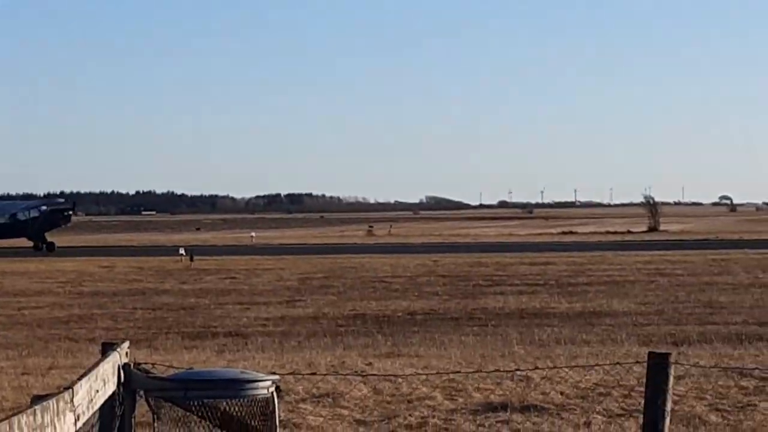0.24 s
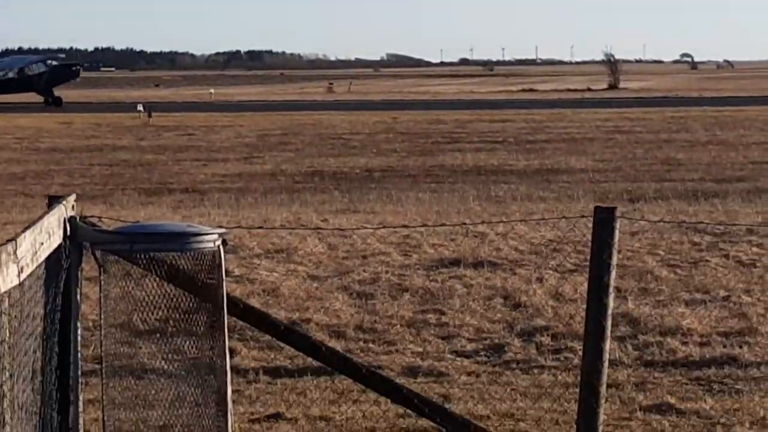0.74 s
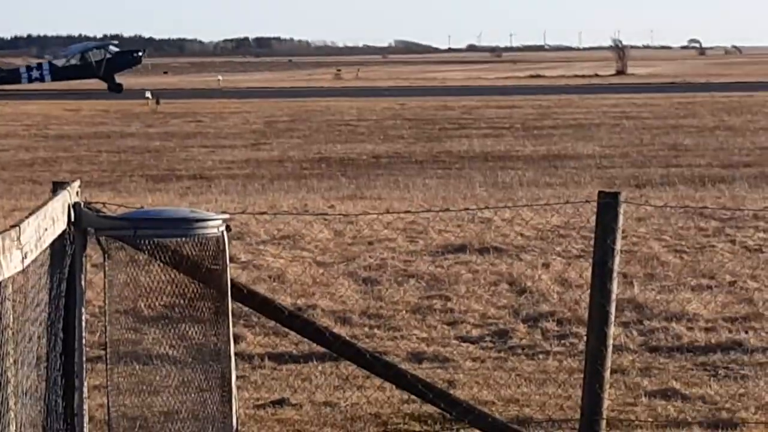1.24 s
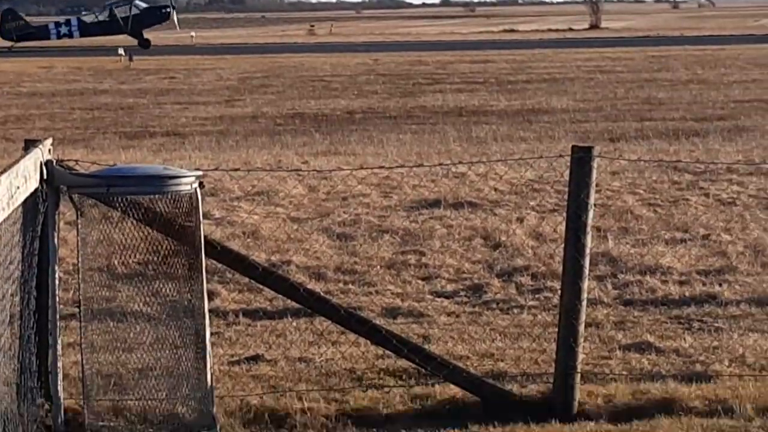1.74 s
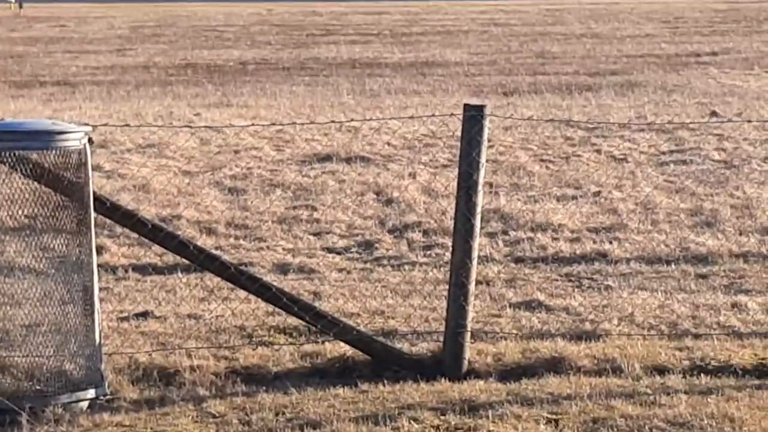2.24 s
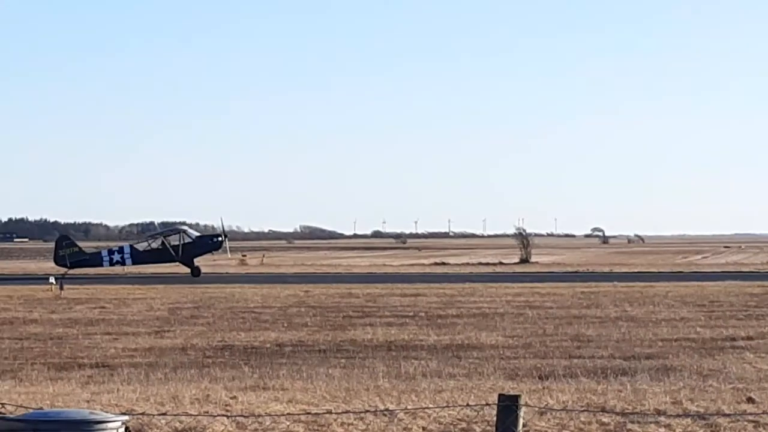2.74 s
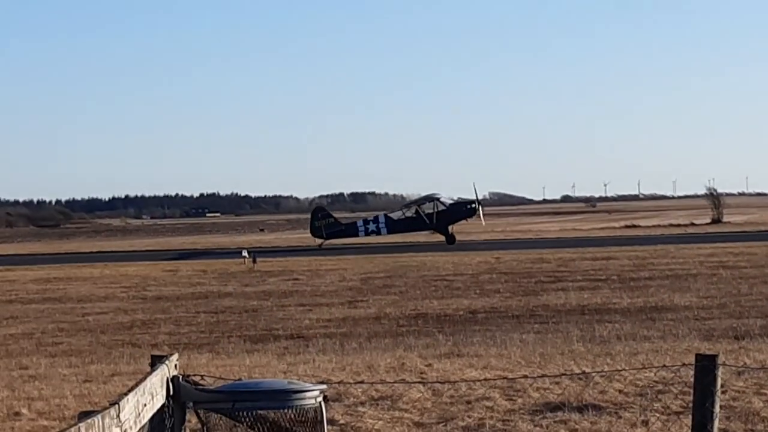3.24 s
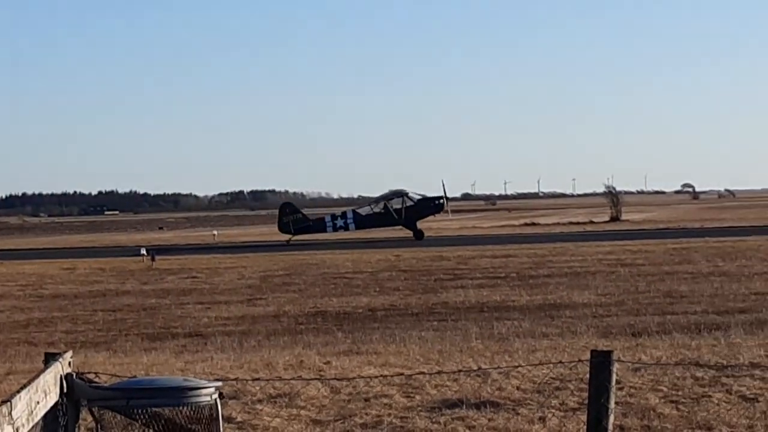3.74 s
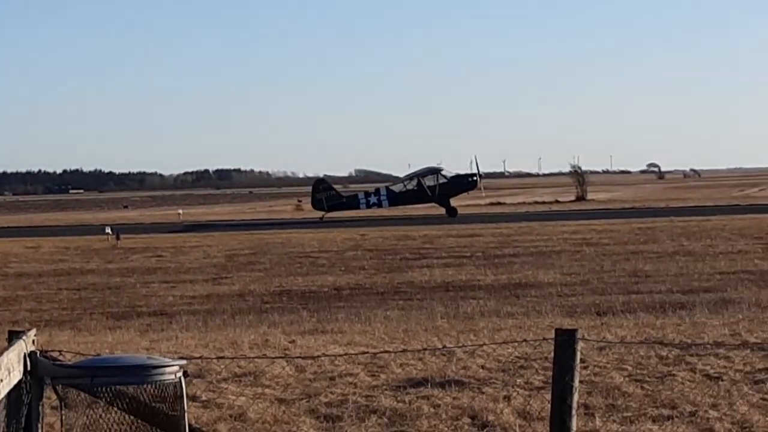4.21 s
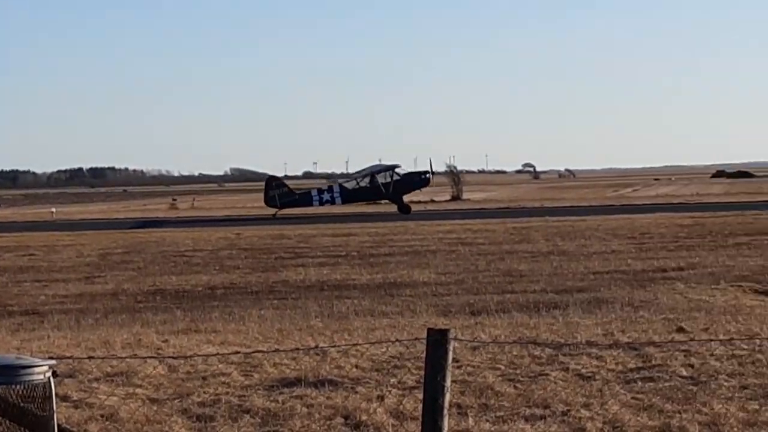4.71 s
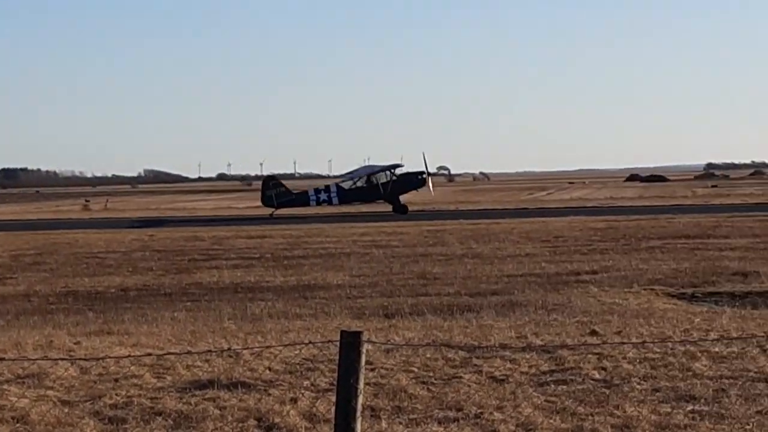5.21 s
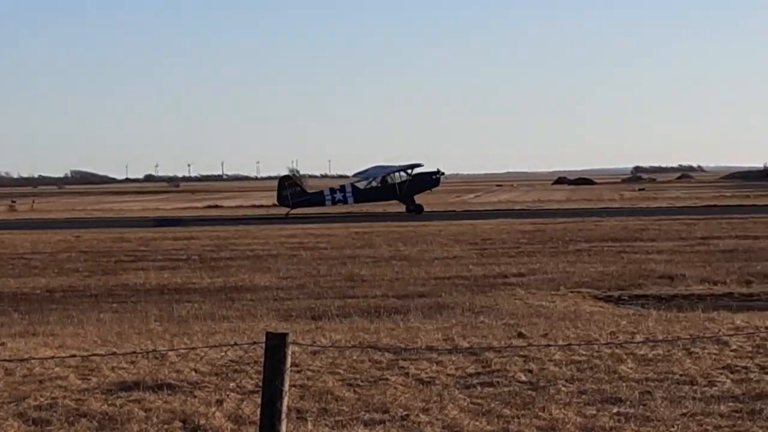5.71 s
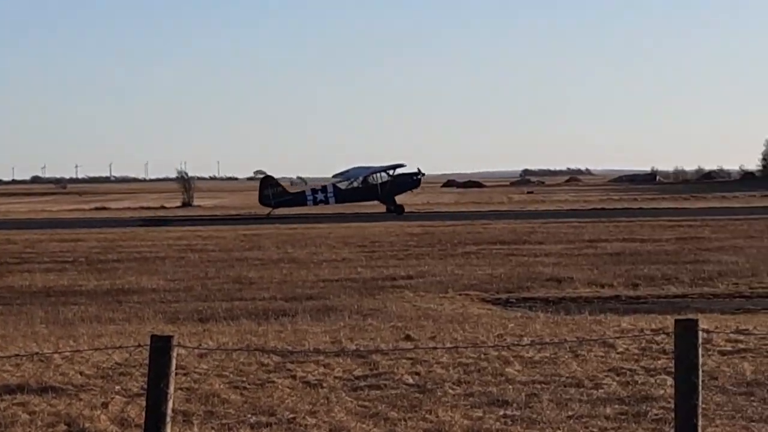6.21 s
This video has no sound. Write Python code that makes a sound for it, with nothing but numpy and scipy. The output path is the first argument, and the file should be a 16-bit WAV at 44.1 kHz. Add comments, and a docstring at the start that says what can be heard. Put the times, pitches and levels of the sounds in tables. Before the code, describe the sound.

A single-engine propeller plane accelerates along a runway, heard from a fence across open grass. Its low fluttering drone climbs in pitch, with rapid exhaust bark and pulsing hiss that brighten and strengthen toward the end. Wind thumps the handheld stereo microphone early and late, crackling more on the right, with a quieter stretch between. Faint handling rustles, a short scuff and tiny clicks sit very close.

```python
"""Light aircraft rolling past

A single-engine aircraft opens its throttle and rolls past on a runway, heard from the airfield fence.
Four cylinders and a two-blade propeller give a drone of sine partials, and gated noise makes the
rattling bark and pulsing hiss. Bundles of filtered noise buffet the two microphone ports, with rustles,
a scrape and clicks close by over a grassy rumble. A wind filter ducks the bass of the right port.
"""
import sys
import numpy as np
from scipy import signal
from scipy.fft import rfft, irfft
from scipy.io import wavfile
from scipy.ndimage import uniform_filter1d, map_coordinates

SR = 44100
rng = np.random.default_rng(int(sys.argv[2]) if len(sys.argv) > 2 else 0)


def dump(signal):
    """Clip the signal to [-1, 1] and save it as 16-bit WAV at the path in sys.argv[1]."""
    limited = np.clip(np.atleast_2d(signal).T, -1, 1)
    pcm = np.round(limited * 32767).astype(np.int16)
    wavfile.write(sys.argv[1], SR, pcm)


N = 284753
TIME = np.arange(N) / SR  # seconds
FREQ = np.maximum(np.arange(N // 2 + 1) * SR / N, 1)  # Hz, kept off zero for the logarithms

# engine speed as heard, in firings and blade passes a second: time_s, firing_rate_hz
ENGINE_SPEED = [(0.1, 38.9), (0.5, 39.9), (1, 43.15), (1.4, 46.95), (1.8, 48.15), (2.2, 49.55), (2.6, 49.8),
                (3, 50.05), (3.4, 50.3), (3.8, 50.35), (4.2, 50.95), (4.6, 51.9), (5, 52.17), (5.4, 53.82),
                (5.8, 54.56), (6.1, 56.54), (6.4, 57.79)]
# propeller drone before the balance of its partials: time_s, level_db
DRONE_LEVEL = [(0, -40), (1, -49), (2.3, -46), (3, -44), (4, -41.5), (5, -41), (5.8, -41), (6.4, -35)]
# drone partials: multiple_of_firing_rate, early_level_db, late_level_db
DRONE_PARTIALS = [(1, -7.5, -2.5), (2, 1, -1.5), (3, -17.5, -12.5), (4, -34.5, -14), (5, -30, -29),
                  (6, -19.5, -16)]
# exhaust bark as it carries across the field, before the mix trims: time_s, level_db
BARK_CURVE = [(0, -55), (0.3, -51.5), (0.85, -45), (1.35, -49.5), (1.9, -42.5), (2.2, -48.5), (3.35, -48),
              (3.6, -43), (4.65, -38), (4.85, -42.5), (5.3, -47.5), (5.9, -46), (6.18, -39), (6.4, -37)]
# tone of the exhaust bark: freq_hz, level_db
BARK_SPECTRUM = [(150, -48), (420, -11), (600, -5), (820, -7.5), (1030, -0.5), (1300, -4.5), (1580, -0.5),
                 (1850, 2), (2050, 1), (2250, -4.5), (2600, -9.5), (3100, -58)]
# ringing of the exhaust stubs: freq_hz, width_hz, boost_db
EXHAUST_STUBS = [(1079, 12, 9), (1163.4, 16.6, 12.5), (1377, 170, 10), (1766, 6.2, 7.5), (2040, 83, -4.5)]
# hiss, which fades in and out more than the bark, before the mix trims: time_s, level_db
HISS_CURVE = [(0, -74), (0.7, -56), (1.5, -52), (1.9, -49.5), (2.2, -63), (2.72, -67.5), (2.9, -58.5),
              (3.1, -57.5), (3.27, -58.5), (3.42, -55), (3.72, -57.5), (3.85, -47.5), (3.97, -50.5),
              (4.08, -47), (4.24, -43.5), (4.4, -49), (5.17, -47), (5.28, -52.5), (5.7, -44.5), (5.9, -49),
              (6.05, -46.5), (6.15, -42.5), (6.4, -41.5)]
# tone of the hiss from the side: freq_hz, level_db
HISS_SIDE_SPECTRUM = [(2200, -3.5), (2900, -6), (3500, 2.5), (4100, 0), (4900, -6.5), (5500, -2.5),
                      (6200, -8.5), (7200, -18), (8300, -21), (10000, -18), (11400, -26.5), (12200, -33),
                      (15500, -36)]
# tone of the hiss while the nose still points at the listener: freq_hz, level_db
HISS_AHEAD_SPECTRUM = [(1900, -1.5), (2600, 6), (3100, -5.5), (3700, -8), (4300, 2), (5100, 0.5),
                       (6200, -8.5), (7200, -14), (8500, -31), (15000, -22)]
HISS_LEAD = 0.16  # share of a firing by which the hiss comes before the bark
# peaks and hollows of the rasp from ahead: freq_hz, width_hz, part_throttle_db, full_throttle_db
NOSE_RESONANCES = [(710, 1100, 0.5, -9), (1380, 230, -1.5, -1.5), (1690, 100, -6, -13), (1940, 220, 2, 9),
                   (2220, 140, 0.5, -7), (2410, 340, 1, 1.5), (2850, 340, -5, -5.5), (3020, 170, 4.5, 11.5),
                   (3470, 200, 4, 9), (4160, 300, -3, -1)]
# bounce off the ground; the lag also drifts a little by chance: time_s, lag_ms, share_of_direct
GROUND_BOUNCE = [(0.5, 1.3, 0.31), (1.2, 1.19, 0.14), (1.7, 1.6, 0.14), (2.3, 1.68, .25), (3.2, 1.58, 0.16),
                 (3.9, 1.78, 0.31), (6.4, 1.676, 0.2)]
# aircraft at the two ports while it approaches: freq_hz, left_lead_rad
PORT_PHASE_AHEAD = [(0, -0.5), (600, 2.5), (1120, -5.5), (1810, -5), (2410, 0.5), (3010, 1.5), (3620, -5.5),
                    (3960, -1), (4740, -4.5), (6030, -4.5), (7490, 1.5), (8350, -11), (9130, -18),
                    (15300, -20.5)]
# aircraft at the two ports from the side: freq_hz, left_lead_rad
PORT_PHASE_SIDE = [(0, 1), (1720, -1.4), (2240, 5.5), (2670, 4), (2930, 5.5), (3530, 2), (4570, 1.5),
                   (5080, -0.7), (6800, 0.2), (7150, -7.5), (8010, -2), (11000, -7), (15300, -10.5)]
# aircraft colour, right port against left: freq_hz, right_minus_left_db
PORT_TONE = [(100, -5.5), (450, -2), (1300, -0.5), (2500, -2), (3100, 4.5), (4000, 0), (4900, -5.5),
             (6000, 2.5), (8000, -1.5), (10000, -12.5), (15000, -1)]

# gusts that stand out, before the port trims: time_s, left_db, right_db, right_crackle_db, half_length_s
STRONG_GUSTS = [(0.01, -23.5, -28, -51, 0.012), (0.041, -28, -43, -60, 0.012),
                (0.069, -27, -28.5, -51, 0.017), (0.145, -24.5, -31, -58, 0.007),
                (0.187, -24.5, -28.5, -56, 0.013), (0.204, -35.5, -28, -46, 0.0043),
                (0.232, -36.5, -32, -43, 0.008), (0.301, -33, -29.5, -37.5, 0.045),
                (0.314, -30.5, -27, -36, 0.013), (0.336, -28.5, -32, -41, 0.0053),
                (0.405, -31, -25.5, -42, 0.013), (0.438, -21, -30.5, -50, 0.014),
                (0.469, -28, -22.5, -46, 0.0058), (0.493, -28, -23.5, -30, 0.0083),
                (0.523, -21.5, -27, -44, 0.0092), (0.568, -21, -23, -52, 0.0079),
                (0.622, -29.5, -28, -36, 0.014), (0.664, -21, -22, -54, 0.011),
                (0.725, -24, -25.5, -61, 0.009), (0.767, -52, -52, -35, 0.0031),
                (0.787, -44, -33, -44, 0.0049), (0.821, -35.5, -42, -55, 0.009),
                (0.993, -40, -39.5, -47, 0.011), (1.056, -52, -38, -48, 0.0051),
                (1.108, -32.5, -40.5, -55, 0.011), (1.236, -36, -46.5, -66, 0.012),
                (1.386, -29, -45, -67, 0.0096), (1.934, -32, -41, -62, 0.013), (2.108, -44, -42, -69, 0.03),
                (4.698, -59, -33.5, -26.5, 0.023), (4.828, -29, -29, -43, 0.0052),
                (4.971, -24, -23.5, -38, 0.0046), (4.995, -32, -25.5, -32, 0.0089),
                (5.031, -34, -28.5, -36, 0.019), (5.083, -36, -30, -43, 0.0086),
                (5.156, -27, -33, -53, 0.0091), (5.181, -38, -32, -23, 0.0041),
                (5.249, -31, -28.5, -34.5, 0.0097), (5.295, -34, -33.5, -33, 0.0064),
                (5.327, -33.5, -27.5, -37, 0.0099), (5.369, -35, -32.5, -37, 0.017),
                (5.388, -29, -27.5, -35, 0.0067), (5.428, -42, -28.5, -61, 0.018),
                (5.475, -53, -38, -34, 0.0077), (5.506, -48, -30.5, -28.5, 0.012),
                (5.591, -37.5, -28, -32.5, 0.016), (5.639, -25.5, -36, -45, 0.018),
                (5.681, -47, -28.5, -30.5, 0.0083), (5.742, -39, -25.5, -28, 0.01),
                (5.78, -32, -21, -28.5, 0.0036), (5.957, -39, -30, -43, 0.011),
                (5.996, -34, -30.5, -26, 0.0059), (6.049, -36, -29, -39, 0.01),
                (6.161, -31.5, -29.5, -38, 0.0099), (6.244, -55, -35, -32.5, 0.011)]
# force of the wind, as an average small gust before the port trims: time_s, left_db, right_db
WIND_FORCE = [(0, -39, -45), (0.66, -52, -30), (0.75, -52, -50.5), (2.1, -49.5, -48.5), (2.25, -56, -57),
              (3.5, -67, -52.5), (4.6, -47.5, -46), (4.8, -34, -37.5), (5.65, -39, -42),
              (5.85, -42.5, -37.5), (6.4, -46, -34)]
# crackle of a small gust against its buffet; later wind has less of it: time_s, crackle_minus_buffet_db
CRACKLE_BALANCE = [(2.5, -9), (4.8, -18.5)]
GUSTS_PER_S, GUST_JITTER = 28, .22  # jitter as a share of the mean gap
GUST_HALF_S, GUST_SCATTER_DB = 0.0091, 1.5  # half length and uneven strength of small gusts
GUST_CLEAR_S = .016  # small gusts keep this far from the strong ones
# tone of the buffeting on the left port: freq_hz, level_db
LEFT_BUFFET_SPECTRUM = [(30, -43), (60, -17.5), (100, -1.5), (170, -10.5), (280, -5.5), (410, -11),
                        (650, -28), (1200, -38.5), (2000, -37), (3000, -78)]
# tone of the buffeting on the right port: freq_hz, level_db
RIGHT_BUFFET_SPECTRUM = [(30, -26), (60, -15), (110, -0.5), (190, -4), (340, 3), (450, -1), (700, -10.5),
                         (1400, -23.5), (3000, -65), (8000, -87)]
# tone of the wind crackle on the right port: freq_hz, level_db
CRACKLE_SPECTRUM = [(150, -20), (500, 14), (1000, 7.5), (1900, 6), (2800, -17.5), (6000, -29), (9000, -45),
                    (15000, -78)]
# big slow eddies that thump both ports, before the right port's trim: time_s, level_db
THUMP_HITS = [(1.119, -32), (1.335, -32), (1.414, -27.5), (1.802, -30), (1.93, -35), (2.01, -28.5),
              (4.61, -31), (4.862, -24), (4.95, -33), (5.135, -25), (5.41, -24), (5.652, -24)]
# tone of the thumps: freq_hz, level_db
THUMP_SPECTRUM = [(30, -15), (60, -4), (100, 13), (160, 1.5), (280, -12), (500, -16), (2000, -63)]
THUMP_HALF_S = 0.012
# single hard cracks of the wind on the right port, before ringing and trim: time_s, strike_db
WIND_CRACKS = [(0.202, -27), (0.234, -23), (0.669, -15.5), (4.703, -11), (4.829, -25), (4.977, -14),
               (5.0, -18), (5.014, -10.5), (5.072, -14), (5.182, -23), (5.299, -31), (5.33, -19),
               (5.465, -13), (5.474, -12.5), (5.504, -12), (5.685, -22), (5.745, -32), (5.779, -13),
               (6.006, -10), (6.04, -15), (6.167, -7), (6.203, -14)]

# soft rustles close to the microphone, before the port trims: time_s, peak_db, half_length_s, brightest_hz
RUSTLE_SWELLS = [(0.09, -63, 0.044, 12000), (1.477, -61.5, 0.079, 14500), (1.947, -59.5, 0.16, 14000),
                 (2.054, -61, 0.12, 11500), (2.523, -70, 0.14, 12100), (3.124, -65.5, 0.071, 12300)]
# tone of the rustles and clicks: freq_hz, level_db
RUSTLE_SPECTRUM = [(500, -30), (1600, -22), (3000, 13), (6000, 11.5), (8300, -2), (11000, 4.5), (15500, -1)]
RUB_DB, RUB_ENDS_S = -71.5, 2.74  # faint rubbing under the rustles, before the port trims
# tone of the brief scrape near the microphone: freq_hz, level_db
SCUFF_SPECTRUM = [(500, -13), (1000, -6), (1250, 7), (1850, 4), (2300, -15), (4000, -36)]
# tiny clicks close to the microphone: time_s, peak_db
TICK_HITS = [(0.833, -55), (3.161, -50)]
TICK_S = 0.002  # decay time either side of the peak
# tone of the breeze over the field: freq_hz, level_db
FIELD_SPECTRUM = [(20, -29), (50, 3), (100, 11.5), (200, -0.5), (400, -19.5), (800, -19), (1100, -4),
                  (2500, -27), (6000, -26), (8500, -54), (15500, -68)]
TOP_HZ = 15650  # upper limit of the finished sound


def aircraft():
    """Drone, exhaust bark and hiss on one crankshaft; part arrives direct, part scattered by the field."""
    firings = 1 + np.cumsum(curves(ENGINE_SPEED)[0]) / SR + .008 * walk(4)
    # the nose points less and less at the listener
    angle = np.pi / 2 * np.clip((TIME - 2.1) / 0.63, 0, 1)
    ahead, side_on = np.cos(angle), np.sin(angle)

    bark_puffs = puffs(firings, width=.16, pattern_db=[.6, -.4, .3, -.6], scatter_db=1.0)
    hiss_puffs = puffs(firings + HISS_LEAD, width=.115, pattern_db=[.6, -.6, .6, -.6], scatter_db=1.6)
    bark_gate = unit(.7 + .3 * side_on + bark_puffs)
    hiss_gate = unit(.95 + .4 * side_on + hiss_puffs)
    # moving air makes the treble shimmer more than the bark
    bark_gain = undb(curves(BARK_CURVE)[0] + .7 * walk(8))
    hiss_gain = undb(curves(HISS_CURVE)[0] + 1.3 * walk(8))

    bark = exhaust_bark(firings, bark_gate, bark_gain)
    rattle = ground_echo(undb(0.2) * bark + undb(-1.5) * gas_hiss(hiss_gate, hiss_gain, ahead, side_on))
    # eddies along the path shift the colour of the rasp
    rattle = flutter(rattle, per_s=4, width_hz=330, depth_db=1.4)
    direct = drone(firings) + cylinder_throb(firings) + nose_on(rattle)

    def scattered():
        """Bark and hiss with fresh turbulence for one port, gated by the same firings."""
        loose_bark = bark_gain * colour(bark_gate * noise(), exhaust_response())
        loose_hiss = gas_hiss(hiss_gate, hiss_gain, ahead, side_on)
        return nose_on(undb(-7.5) * loose_bark + undb(-7.0) * loose_hiss)

    left = direct + scattered()
    right = direct + scattered()
    right_ahead = at_right_port(ahead * right, PORT_PHASE_AHEAD)
    right_side = at_right_port(side_on * right, PORT_PHASE_SIDE)
    return np.array([left, right_ahead + right_side])


def drone(firings):
    """Low partials of blades and firings; their level steadies, then their balance shifts abeam."""
    abeam = np.clip((TIME - 4.2) / 1.6, 0, 1)
    waver_db = np.interp(TIME, [1.8, 2.6], [2.6, 1.1])
    tone = np.zeros(N)
    for multiple, early_db, late_db in DRONE_PARTIALS:
        level_db = early_db + (late_db - early_db) * abeam + waver_db * walk(18.0)
        phase = 2 * np.pi * (round(multiple) * firings + rng.random())
        tone += undb(level_db) * np.sin(phase)
    return np.sqrt(2) * tone * undb(curves(DRONE_LEVEL)[0])


def exhaust_bark(firings, gate, gain):
    """Turbulence gated by the firings rings in the exhaust stubs, half of it alike in every cycle."""
    gas = repeating(firings) + .55 * noise()
    bark = colour(gate * gas, exhaust_response()) * gain
    # the top of the bark opens up as the exhaust turns towards the fence
    top = irfft(rfft(bark) * response([(1300, -16.5), (1750, 4.5), (2300, 3.0), (3000, -12)]), N)
    top_db = np.interp(TIME, [3.0, 4.2, 6.3], [-2.5, 1.3, 3.5])
    return bark + top * (undb(top_db) - 1)


def exhaust_response():
    """Gain of the exhaust: its broad tone plus the narrow ringing of the stubs."""
    ringing_db = sum(db / (1 + (2 * (FREQ - hz) / width) ** 2) for hz, width, db in EXHAUST_STUBS)
    return response(BARK_SPECTRUM) * undb(ringing_db)


def gas_hiss(gate, gain, ahead, side_on):
    """Gas rasp at each firing, pulsing more deeply from ahead than from the side."""
    gas = gate * flutter(noise(), per_s=45, width_hz=700, depth_db=2.0)
    # the very top only carries when the hiss is at its strongest
    sizzle_db = 2 * np.minimum(curves(HISS_CURVE)[0] + 45, 0) - 26
    sizzle = undb(sizzle_db) * colour(gas, response([(7000, -30), (14000, -2)]))
    from_ahead = ahead * colour(gas, response(HISS_AHEAD_SPECTRUM))
    from_side = side_on * colour(gas, response(HISS_SIDE_SPECTRUM))
    return gain * (from_ahead + from_side + sizzle)


def cylinder_throb(firings):
    """Unequal cylinders put a comb of quarter orders under the bark."""
    spectrum = [(60, -8.5), (160, -3), (260, 5.5), (400, -4.0), (560, -3.5), (850, -34.5)]
    level_db = np.minimum(curves(DRONE_LEVEL)[0], -39.0) - 8.0
    return colour(repeating(firings), response(spectrum)) * undb(level_db)


def puffs(firings, width, pattern_db, scatter_db):
    """Firing envelope: a quick burst and a longer tail, its strength set by the cylinder and by chance."""
    index, age = firings.astype(int), firings % 1
    chance_db = scatter_db * np.clip(noise(), -2, 2)[index]
    size = undb(np.array(pattern_db)[index % len(pattern_db)] + chance_db)
    age = age - .3 - .02 * noise()[index]  # each firing is slightly early or late
    burst = (age / (.6 * width)) ** 2
    tail = abs(age / (2 * width)) ** 1.3
    return unit(size * np.exp(-np.where(age < 0, burst, tail)))


def repeating(firings, count=4, size=3600):
    """Gas turbulence that comes back alike in every four-firing cycle."""
    place = firings % count / count * size
    return unit(np.interp(place, np.arange(size), rng.standard_normal(size)))


def nose_on(x):
    """From ahead the rasp has hollow resonances, sharper with open throttle, gone as the nose turns away."""
    def ringing(column):
        boost_db = sum(row[column] / (1 + (2 * (FREQ - row[0]) / row[1]) ** 4) for row in NOSE_RESONANCES)
        return irfft(rfft(x) * undb(boost_db), N)

    opened = np.interp(TIME, [1.5, 1.75], [0, 1])
    turned = np.interp(TIME, [1.95, 2.3], [0, 1])
    hollow = (1 - opened) * ringing(column=2) + opened * ringing(column=3)
    return (1 - turned) * hollow + turned * x


def ground_echo(x):
    """A later, duller bounce off the grass combs the spectrum; the comb glides as the aircraft rolls."""
    lag_ms, share = curves(GROUND_BOUNCE)
    lag_s = lag_ms * (1 + .02 * walk(3)) / 1000
    soft = irfft(rfft(x) / (1 + (FREQ / 6500) ** 6), N)
    return x + share * np.interp(TIME - lag_s, TIME, soft)


def flutter(x, per_s, width_hz, depth_db):
    """Patches of the spectrum, about width_hz wide, swell and fade about per_s times a second."""
    hz, s, spectrum = signal.stft(x, SR, nperseg=512, noverlap=384)
    grid = np.meshgrid(hz / width_hz, s * per_s, indexing="ij")
    patches = map_coordinates(rng.standard_normal((256, 512)), grid, mode="mirror")
    gain = undb(depth_db * patches)
    return signal.istft(spectrum * unit(gain), SR, nperseg=512, noverlap=384)[1][:N]


def at_right_port(x, phase):
    """The path round the microphone body turns the phase and colours the sound."""
    turn = np.exp(-1j * np.interp(FREQ, *np.transpose(phase)))
    return irfft(rfft(x) * response(PORT_TONE) * turn, N)


def wind():
    """Small eddies strike the ports unequally, big ones thump both; the exposed right port also crackles."""
    s, left_db, right_db, crackle_db, half_s = np.vstack([STRONG_GUSTS, small_gusts()]).T
    left = buffets(zip(s, left_db, half_s), LEFT_BUFFET_SPECTRUM, eddy_hz=128, eddy_db=4.0)
    right = buffets(zip(s, right_db, half_s), RIGHT_BUFFET_SPECTRUM, eddy_hz=165, eddy_db=4.0)
    crackle = buffets(zip(s, crackle_db, 0.69 * half_s), CRACKLE_SPECTRUM, eddy_hz=624, eddy_db=9.5)
    thump_rows = [(at, db, THUMP_HALF_S) for at, db in THUMP_HITS]
    thumps = buffets(thump_rows, THUMP_SPECTRUM, eddy_hz=60.6, eddy_db=0.5)
    cracks = snaps(WIND_CRACKS, decay_s=0.00048, ring_hz=1210)
    left_port = undb(3.0) * left + thumps
    right_port = undb(4.5) * right + undb(3.5) * crackle + undb(2.0) * cracks + undb(-3.0) * thumps
    return np.array([left_port, right_port])


def small_gusts(count=240):
    """An uneven run of gusts that follow the force of the wind: rows like those of STRONG_GUSTS."""
    slip, left, right, crackle = rng.standard_normal((count, 4)).T
    s = (np.arange(count) + .5 + GUST_JITTER * slip) / GUSTS_PER_S
    times, left_db, right_db = np.transpose(WIND_FORCE)
    left_db = np.interp(s, times, left_db) + GUST_SCATTER_DB * left
    right_db = np.interp(s, times, right_db) + GUST_SCATTER_DB * right
    crackle_db = right_db + np.interp(s, *np.transpose(CRACKLE_BALANCE)) + GUST_SCATTER_DB * crackle
    clear = abs(s[:, None] - np.array(STRONG_GUSTS)[:, 0]).min(axis=1) > GUST_CLEAR_S
    rows = np.transpose([s, left_db, right_db, crackle_db, np.full(count, GUST_HALF_S)])
    return rows[clear & (s > 0) & (s < TIME[-1])]


def buffets(rows, spectrum, eddy_hz, eddy_db):
    """Each gust (time_s, level_db, half_length_s) is a short bundle of uneven eddies striking a port."""
    unevenness_db = eddy_db * 2 * np.tanh(walk(eddy_hz) / 2)
    eddies = colour(noise() * undb(unevenness_db), response(spectrum))
    out = np.zeros(N)
    for s, db, half_s in rows:
        near = np.flatnonzero(abs(TIME - s) < 5 * half_s)
        age = (TIME[near] - s) / half_s
        swell = np.exp(-abs(age * np.where(age < 0, 1.15, .85)) ** 0.94)  # it builds faster than it dies
        out[near] += undb(db) * unit(swell * eddies[near]) * np.sqrt(np.mean(swell ** 2))
    return out


def snaps(rows, decay_s, ring_hz):
    """The hardest eddies (time_s, strike_db) each ring once, briefly, against the right port."""
    strikes, age = np.zeros(N), TIME[:300]
    ring = np.exp(-age / decay_s) * np.sin(2 * np.pi * ring_hz * age)
    crack = np.convolve(ring, np.hanning(9) / 4)  # rounds off the onset
    for s, db in rows:
        strikes[min(int(s * SR), N - 1)] += undb(db)
    return signal.fftconvolve(strikes, crack)[:N]


def rustle():
    """Brief swells of bright rubbing noise, each with its own sheen, stronger on the right."""
    def port():
        rub_gain = undb(RUB_DB) * np.clip((RUB_ENDS_S - TIME) / .2, 0, 1)
        out = rub_gain * colour(noise(), response(RUSTLE_SPECTRUM))
        for s, db, half_s, hz in RUSTLE_SWELLS:
            sheen = undb(7.0 / (1 + ((FREQ - hz) / 1400) ** 2))
            swell = undb(db) * np.exp(-((TIME - s) / half_s) ** 2)
            out = out + swell * colour(noise(), response(RUSTLE_SPECTRUM) * sheen)
        return out

    grain = undb(1.0 * walk(40) + 1.7 * walk(900))
    return np.array([grain * undb(trim_db) * port() for trim_db in (.5, 3)])


def scuff():
    """One short, grainy scrape of filtered noise close to the microphone."""
    swell = np.exp(-((TIME - 2.05) / .085) ** 4) * undb(-44 + 3.5 * walk(80))
    swell = swell + undb(-29) * np.exp(-abs(TIME - 1.987) / 0.0012)  # it catches as it starts
    return undb(2.0) * np.array([swell * colour(noise(), response(SCUFF_SPECTRUM)) for _ in range(2)])


def ticks():
    """Tiny bright clicks close to the microphone: noise under very short peaks."""
    gain = sum(undb(db) * np.exp(-abs(TIME - s) / TICK_S) for s, db in TICK_HITS)
    return np.array([gain * colour(noise(), response(RUSTLE_SPECTRUM)) for _ in range(2)])


def field():
    """Breeze over open grass: a restless rumble, partly shared by the ports, and a faint hiss."""
    rumble = colour(noise(), response([(20, -18), (50, 6.5), (110, 9.5), (200, -6), (600, -68.0)]))
    shared = undb(-49.5 + 2.6 * walk(14)) * rumble

    def port(level_db):
        return undb(level_db + 3.04 * walk(19.0)) * colour(noise(), response(FIELD_SPECTRUM))

    return shared + np.array([port(-51), port(-48)])


def undb(db):
    """Decibels to gain."""
    return 10 ** (np.asarray(db) / 20)


def curves(table):
    """Each column of a timed table, sample by sample."""
    s, *columns = np.transpose(table)
    return [np.interp(TIME, s, c) for c in columns]


def response(points):
    """Gain at every frequency from (freq_hz, level_db) points."""
    hz, db = np.transpose(points)
    return undb(np.interp(np.log(FREQ), np.log(hz), db))


def unit(x):
    """Scale to rms 1."""
    return x / np.sqrt(np.mean(x ** 2) + 1e-18)


def colour(x, gain):
    """Filter by a frequency response; rms 1."""
    return unit(irfft(rfft(x) * gain, N))


def noise():
    """White noise."""
    return rng.standard_normal(N)


def walk(rate):
    """Smooth chance that changes about rate times a second; spread 1."""
    return colour(noise(), 1 / (1 + (FREQ / rate) ** 4))


def scene():
    """Aircraft, wind, the noises at the microphone and the field."""
    return aircraft() + wind() + rustle() + scuff() + ticks() + field()


def wind_filter(ports, corner_hz, threshold_db, depth_db, hold_s, margin):
    """Cuts the bass of the right port for as long as it carries clearly more buffeting than the left."""
    spectra = rfft(ports)
    bass = irfft(spectra[1] / (1 + (FREQ / corner_hz) ** 12), N)
    buffet = irfft(spectra * response([(130, -26), (180, 6), (600, 6.5), (900, -31)]), N)
    left_power, right_power = uniform_filter1d(buffet ** 2, int(hold_s * SR), axis=1)
    excess_db = 10 * np.log10(np.maximum(right_power - margin * left_power, 1e-18))
    wanted = np.clip((excess_db - threshold_db) / 3, 0, 1)
    closed = uniform_filter1d(wanted, size=900)  # eases in and out over 900 samples
    return ports[1] - bass * (1 - undb(depth_db * closed))


def record(dry):
    """Wind filter on the right port, short fades at both ends, then the top is cut."""
    right = wind_filter(dry, corner_hz=282, threshold_db=-51.0, depth_db=-20.0, hold_s=0.068, margin=1.65)
    fade = np.clip(np.minimum(TIME, TIME[-1] - TIME) / .004, 0, 1)
    top_cut = signal.ellip(12, .2, 90, TOP_HZ, fs=SR, output="sos")
    return signal.sosfilt(top_cut, fade * np.array([dry[0], right]))


dry = scene()
out = record(dry)
dump(out)
```